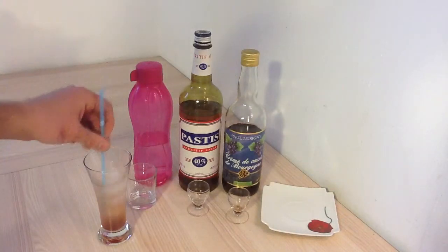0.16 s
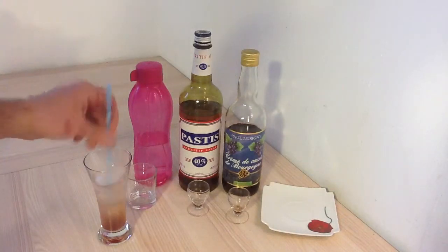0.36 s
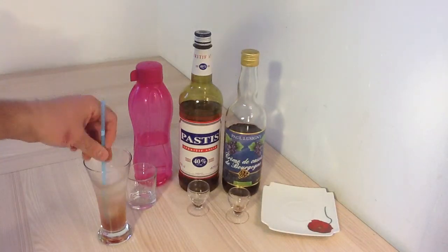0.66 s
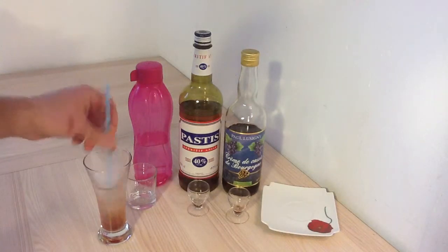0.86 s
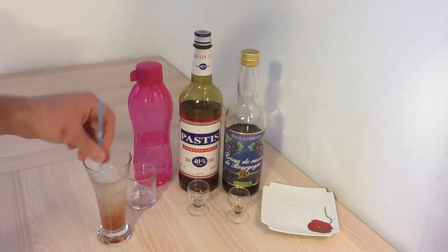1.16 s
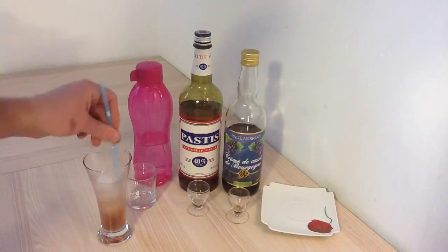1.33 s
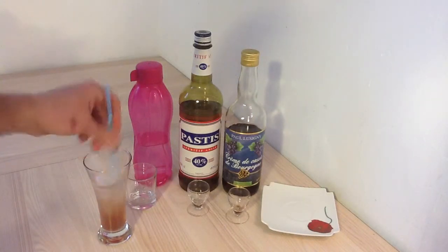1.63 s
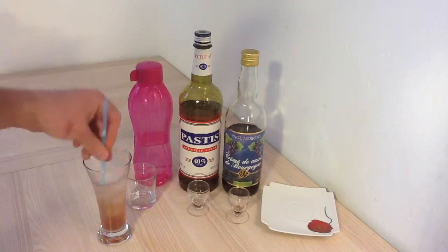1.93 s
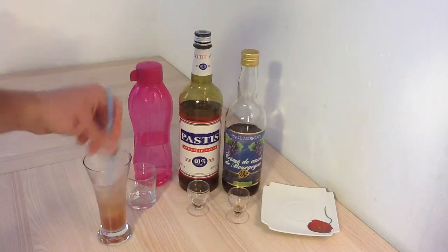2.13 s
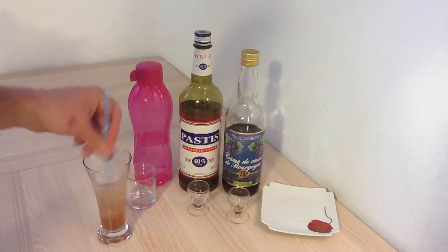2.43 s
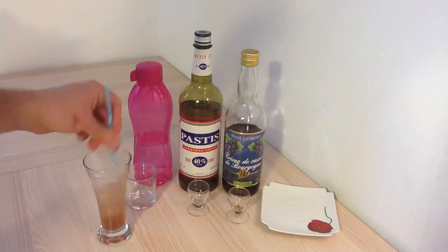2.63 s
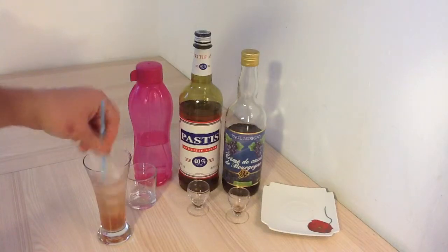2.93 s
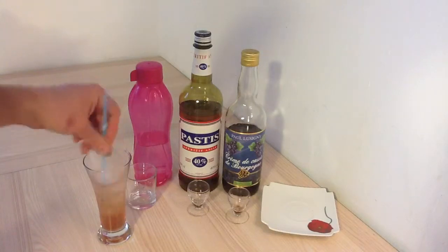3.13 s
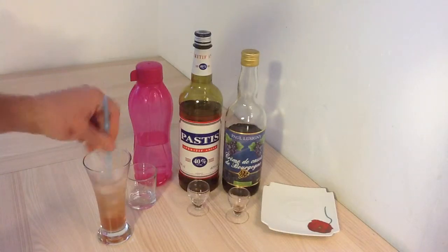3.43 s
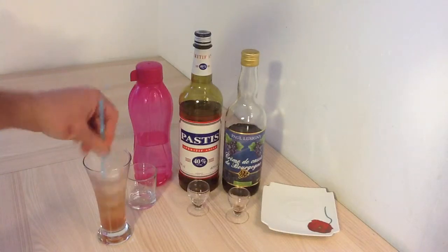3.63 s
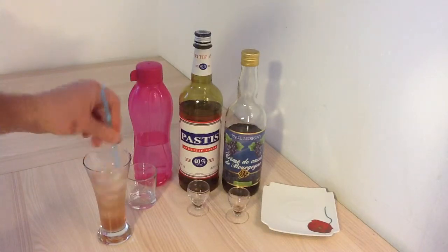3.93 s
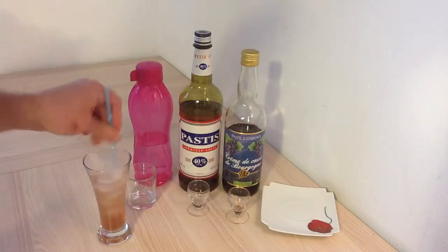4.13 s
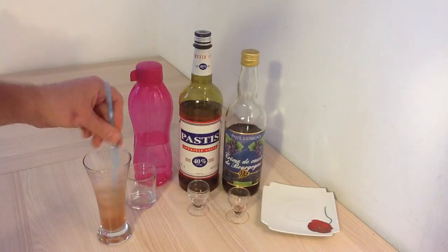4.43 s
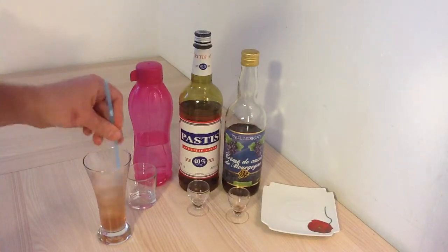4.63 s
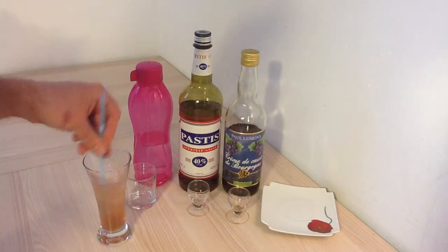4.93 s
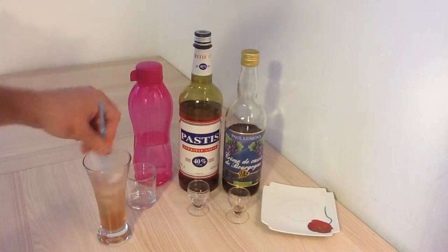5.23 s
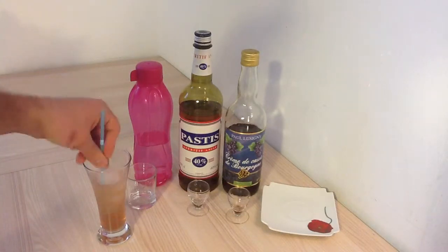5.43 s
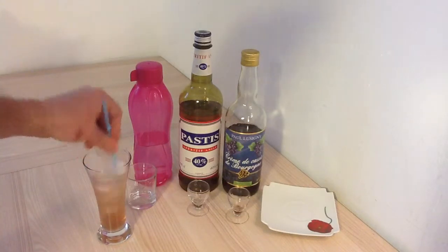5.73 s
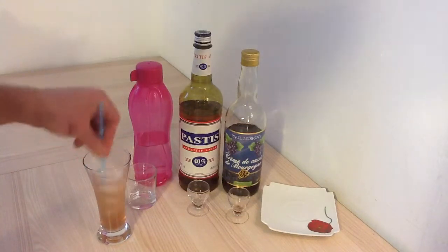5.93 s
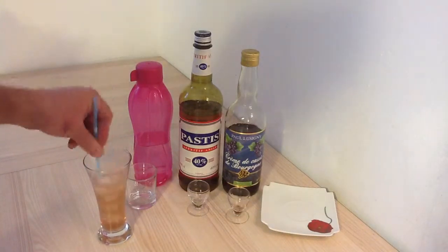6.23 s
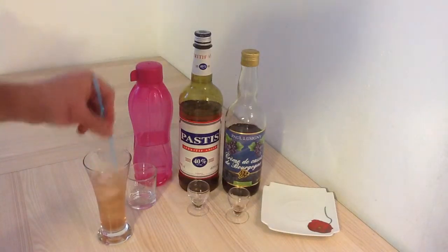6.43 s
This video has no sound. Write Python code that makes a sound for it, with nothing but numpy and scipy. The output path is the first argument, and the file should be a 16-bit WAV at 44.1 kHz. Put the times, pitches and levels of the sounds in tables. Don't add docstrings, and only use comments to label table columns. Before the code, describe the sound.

Ice cubes clink and rattle brightly against a tall glass as a drink is stirred with a straw in a quiet room.

```python
import sys
import numpy as np
from scipy import signal
from scipy.fft import rfft, irfft, next_fast_len
from scipy.io import wavfile
from scipy.ndimage import uniform_filter1d

SR = 44100
rng = np.random.default_rng(int(sys.argv[2]) if len(sys.argv) > 2 else 0)


def attenuation_scalar(level_db):
    decades = np.asarray(level_db, float) / 20
    return 10 ** decades


def bounce(signal):
    frames = np.transpose(np.atleast_2d(signal))
    limited = np.clip(frames, -1, 1)
    pcm = np.round(limited * 32767).astype(np.int16)
    wavfile.write(sys.argv[1], SR, pcm)


N = 289296

# frequency in Hz, density in dB per Hz.
ROOM_TONE = [(41, -55), (70, -4.5), (177, -1), (292, -1), (366, -12), (525, -4.5), (616, -8), (2190, -21),
             (2450, -3), (2810, -16), (15700, -23.5)]
# frequency in Hz, t60 in seconds.
ROOM_DECAY = [(300, 0.59), (2500, 0.18), (6000, 0.29), (14000, 0.25)]

# time in seconds, straw effort in dB, second mode over low mode in dB
STIR = [(0.0, -52, 8), (0.55, -53.5, -13), (0.75, -51, 4.5), (0.89, -49, 9), (1.09, -57, -11),
        (1.7, -53, -7), (2.19, -51, 7), (2.36, -52, -6), (3.21, -54, -18), (3.309, -48, -3),
        (3.95, -51.5, -3.5), (4.99, -52, 5), (5.1, -57, -0.5), (5.33, -54, -21), (5.59, -51.5, -34),
        (6.14, -47.5, 5), (6.28, -49.5, -2), (6.56, -45.5, -30)]
# frequency in Hz, density in dB per Hz.
SLOSH_COLOUR = [(150, -11.5), (350, 20.5), (900, 1.5), (1700, 5.5), (3200, -1), (5500, -1.5), (7500, -37),
                (12000, -3.5), (15500, -50)]

PINGS = [(0.0551, -34.5, 7, 4275), (0.3357, -36, 4, 4260), (1.069, -31.5, -11, 4290),
         (1.1677, -49, 12.5, 4210), (1.302, -32, 2, 4270), (1.3967, -35, 5.5, 4250), (1.438, -39, -8, 4270),
         (1.5728, -33, -10, 4230), (1.6466, -33.5, -4, 4257), (2.021, -27.5, -5, 4270),
         (2.0415, -22, -0.5, 4236), (2.0745, -26, -7, 4220), (2.081, -24, 1, 4303), (2.63, -33.5, -6, 4190),
         (2.8655, -42, 13.5, 4270), (3.3314, -47, 18, 4290), (3.5025, -34, -10, 4250),
         (3.5705, -38, -2, 4240), (3.718, -45, 3, 4270), (0.3283, -38, -9, 4220), (0.86, -38, 2, 4400),
         (1.7046, -47, -5, 4260), (2.2005, -32, -11, 4290), (2.618, -41, -6, 4230), (2.666, -39, -15, 4280),
         (4.7033, -36.5, 3, 4240), (4.78, -52, -1, 4350), (5.543, -34, -7, 4300),
         (2.8217, -24.5, -12, 4220), (3.7675, -22, -21, 4224), (3.9139, -26, -1, 4236),
         (4.4134, -29, -2, 4220), (4.562, -38, 5, 4230), (4.8484, -34, 7, 4300), (5.3125, -34.5, 2.5, 4260),
         (5.601, -27.5, -6, 4234), (6.1038, -22.5, -5, 4340), (5.8148, -34.5, -2, 4160),
         (6.4705, -43.5, 9.5, 4230), (6.527, -41, -24, 4270)]
SQUARE_BLOWS = [(0.076, -28, -4, 4274), (0.595, -33.5, 1, 4254), (0.65, -35.5, -10, 4210),
                (0.6673, -29.5, -3, 4275), (0.7475, -26, -14, 4190), (0.907, -47.5, 14.5, 4370),
                (1.1165, -39.5, -14, 4240), (1.498, -53.5, 15.5, 4310), (2.2657, -27, -4, 4260),
                (2.2896, -25.5, -7, 4250), (2.7586, -23.5, -11, 4256), (3.7546, -33, -4, 4280),
                (3.8178, -25.5, -10, 4240), (4.2317, -30, -7, 4193), (4.361, -22, -12, 4243),
                (4.4525, -25, -35, 4265), (4.58, -27, -6, 4260), (4.816, -27, -21, 4320),
                (4.9445, -27.5, -23, 4280), (5.568, -35.5, -5, 4180)]
CHIPS = [(0.0014, -29.5, 6, 4277), (0.288, -37.5, 6, 4300), (0.5044, -52, 17, 4260),
         (0.53, -33.5, -19, 4210), (0.784, -30.5, 1, 4264), (1.528, -32, -4, 4284), (1.9499, -41, 6, 4270),
         (2.1874, -37.5, 3.5, 4190), (2.415, -42, 9.5, 4230), (2.573, -33.5, 7.5, 4280),
         (2.704, -36, -27, 4280), (2.736, -34, -3, 4280), (1.844, -32.5, -7, 4260),
         (3.1604, -35.5, 5.5, 4260), (3.199, -21, -1.5, 4256), (5.9195, -30.5, 0, 4280),
         (3.347, -32, -6, 4300), (3.408, -31.5, -22, 4270), (3.436, -28.5, -8, 4220),
         (3.6699, -27, -4, 4320), (3.8858, -39, -12, 4200), (5.266, -47, -23, 4220),
         (5.5233, -31.5, -3.5, 4230), (5.736, -27.5, -49, 4260), (0.259, -38, -28, 4290),
         (6.0582, -17, -12, 4295), (6.0792, -19, -13, 4250), (6.3274, -36.5, 3, 4290),
         (0.9908, -34, -5, 4240)]
JAMS = [(0.115, -48, -17, 4270), (0.616, -40.5, 1, 4350), (1.0095, -38.5, 8, 4300), (1.264, -45, 9, 4250),
        (1.2887, -44, 10, 4250), (1.38, -46, -5, 4230), (1.7641, -49, 9, 4260), (1.7794, -34.5, -4, 4310),
        (1.8268, -37.5, 6, 4325), (2.5105, -38, 3, 4270), (2.931, -31.5, -43, 4280),
        (2.9698, -42.5, 7, 4236), (3.645, -44, 1, 4260), (4.1097, -33, -4, 4280), (4.69, -43, -13, 4190),
        (4.957, -34.5, -9, 4305), (5.014, -35, 2.5, 4255), (5.228, -59, -19, 4340),
        (5.468, -30.5, -1, 4280), (5.587, -42.5, 0, 4350), (5.698, -32, -9, 4260),
        (5.9301, -31.5, -6, 4320), (5.9567, -32.5, -2, 4230), (5.9941, -31.5, -1, 4280),
        (6.0326, -28, 2, 4324), (6.0445, -29, -2, 4370), (6.13, -31.5, 3, 4340)]
# crack over ring in dB, ring time in seconds.
CONTACT_KINDS = [(-32.5, 0.042), (-14.5, 0.054), (-11, 0.045), (-3, 0.08)]
# start in seconds,
# ring level in dB, low mode over it in dB, second mode in Hz, ring time in seconds.
SLAMS = [(0.8725, -20.5, 1.5, 4320, 0.025), (2.1011, -14.5, 0, 4270, 0.036),
         (2.8335, -17.5, -3.5, 4216, 0.032), (3.039, -24.5, -6, 4236, 0.024),
         (3.23, -12.5, -0.5, 4287, 0.061), (3.2725, -21, -9, 4354, 0.037), (3.301, -21.5, -22, 4204, 0.048),
         (3.4494, -21, -17, 4220, 0.079), (3.68, -21.5, -11.5, 4266, 0.072), (3.99, -21, -13, 4236, 0.045),
         (4.1382, -22, -2, 4270, 0.074), (4.6128, -16, -6.5, 4232, 0.035),
         (4.826, -12.5, -10.5, 4250, 0.028), (4.8841, -15.5, -10, 4210, 0.069),
         (5.023, -47, 14.5, 4244, 0.2), (5.7494, -19.5, -30, 4270, 0.034), (5.9775, -17, -8.5, 4266, 0.092)]
# frequency in Hz, level in dB, t60 as a factor of the ring time.
UPPER_MODES = [(6702, -15.5, 2.2), (9820, -31.5, 1.4), (13700, -34, 0.6)]

# start in seconds, peak level in dB, pitch in Hz.
TINKS = [(0.0473, -34, 3600), (0.1116, -41, 3630), (0.5985, -30.5, 3620), (0.8599, -27, 3980),
         (0.8719, -19, 3640), (1.01, -33, 3160), (1.0715, -27, 3680), (1.7799, -39, 3570),
         (1.8277, -31, 3600), (1.843, -24, 3740), (2.1011, -20, 3660), (2.2648, -34, 3720),
         (2.4154, -34, 3500), (2.574, -31, 3280), (2.9302, -39, 3260), (3.1924, -25, 3000),
         (3.229, -11, 3650), (3.3553, -24, 3760), (3.5708, -31, 3670), (3.7105, -27, 3050),
         (3.7668, -25, 3000), (3.8172, -27, 3520), (3.911, -28, 3060), (3.9893, -33, 3430),
         (4.131, -28, 2980), (4.2418, -55, 3850), (4.3602, -32, 3030), (4.6136, -29, 3100),
         (4.825, -25, 3970), (4.8252, -14, 3730), (4.8848, -21, 3630), (5.5214, -39, 3080),
         (5.711, -28, 3700), (5.9229, -42, 3590), (5.9309, -33, 3040), (5.976, -23, 3640),
         (6.0566, -15, 3100), (6.1295, -41, 3260), (6.328, -27, 3380), (6.47, -30, 3320)]
# start in seconds, peak level in dB, pitch in Hz.
SPLINTERS = [(0.048, -51, 7730), (0.076, -39, 9840), (0.5057, -52, 11700), (0.5285, -43, 11700),
             (0.674, -33, 7940), (0.7467, -41, 11500), (0.767, -41, 8140), (0.874, -30, 7610),
             (0.9104, -36, 7760), (0.991, -39, 7870), (1.009, -36, 7860), (1.286, -43, 7600),
             (1.7794, -37, 8100), (1.8285, -36, 11200), (2.0325, -29.5, 7860), (2.101, -39, 9820),
             (2.2655, -40, 7700), (2.448, -37.5, 9400), (2.6655, -47, 10400), (2.736, -43, 9400),
             (2.833, -32.5, 9820), (2.929, -37, 7600), (2.943, -32, 9800), (3.219, -37, 9000),
             (3.182, -43, 7600), (3.2016, -34, 9800), (3.203, -29, 8750), (3.301, -37.5, 9700),
             (3.3445, -37, 7840), (3.406, -40, 8040), (3.5718, -46, 9300), (3.5887, -37, 9840),
             (3.6561, -32.5, 11000), (3.8177, -37.5, 7900), (4.1082, -28, 9760), (4.361, -40, 11400),
             (4.4792, -40.5, 7560), (4.561, -40, 10100), (4.578, -33.5, 12300), (4.6124, -27.5, 9700),
             (4.688, -40.5, 9820), (4.799, -35.5, 8660), (4.8255, -28.5, 8700), (4.885, -29, 13700),
             (5.0165, -41, 8650), (5.466, -28, 8000), (5.6914, -31, 8700), (5.8152, -44, 10300),
             (5.931, -34, 7400), (5.928, -33, 7500), (6.0126, -31.5, 9800), (6.0597, -40, 8350)]
# start in seconds, peak level in dB, pitch in Hz.
CUBE_CLICKS = [(0.077, -45, 5400), (0.2875, -34, 5530), (0.505, -40, 5400), (0.5294, -39, 5550),
               (0.6475, -36, 5570), (0.673, -22.5, 5430), (0.769, -31, 5500), (0.85, -35, 5480),
               (0.9118, -21, 5570), (1.528, -42, 5410), (1.756, -36, 5430), (1.774, -31, 5440),
               (1.9797, -32.5, 5450), (2.031, -23, 5480), (2.1011, -33, 5440), (2.2552, -30.5, 5370),
               (2.4159, -52, 5500), (2.4513, -31.5, 5550), (2.5367, -30.5, 5650), (2.7352, -45, 5570),
               (2.8325, -30, 5570), (2.9522, -35, 5500), (3.1597, -47, 5400), (3.192, -27, 5030),
               (3.1958, -21, 5600), (3.204, -27, 5570), (3.228, -23, 5440), (3.346, -32, 5280),
               (3.435, -25.5, 5400), (3.574, -36, 5440), (3.5894, -33, 5330), (3.6027, -26, 5430),
               (3.6566, -30, 5480), (3.8167, -33, 5200), (3.9038, -30.5, 5460), (3.9888, -38, 4900),
               (4.1078, -20.5, 5380), (4.341, -30.5, 5370), (4.361, -38, 5540), (4.4507, -44, 6060),
               (4.482, -46, 5500), (4.612, -33, 5640), (4.687, -33, 5710), (4.7983, -36, 5600),
               (4.827, -37, 5360), (4.8858, -29, 5530), (4.945, -33, 5330), (5.015, -36, 5300),
               (5.4639, -30.5, 5660), (5.47, -26, 5480), (5.6905, -24, 5640), (5.8147, -34, 5520),
               (5.9189, -45, 5860), (5.9324, -43, 5440), (5.9797, -29, 5550), (6.014, -20.5, 5700),
               (6.044, -28, 5770), (6.0785, -19, 5630), (6.3836, -48, 5370)]
# start in seconds, peak level in dB, pitch in Hz.
PLOPS = [(0.077, -41, 1400), (0.78, -49, 1620), (1.009, -44.5, 1610), (6.15, -38, 2020),
         (1.574, -45.5, 1640), (1.6316, -48, 1630), (2.0155, -47, 1680), (2.08, -47, 1590),
         (2.753, -43.5, 1670), (3.222, -44, 1780), (4.5836, -45, 1740), (5.039, -43, 1910),
         (5.232, -52, 1650), (6.267, -43, 1800), (6.311, -44, 1860), (1.299, -47, 1640),
         (1.7618, -47, 1990), (1.777, -46, 1810), (2.271, -46, 1670), (2.5012, -50, 1580),
         (2.929, -48, 1590), (3.432, -46, 1620), (3.587, -48, 1780), (3.619, -39, 1720), (3.645, -32, 1715),
         (3.881, -44.5, 1576), (3.902, -46, 1640), (4.085, -51, 1630), (4.106, -43, 1670),
         (4.137, -40, 1590), (4.342, -48, 1670), (4.827, -42, 1600), (4.836, -38, 1400),
         (4.8452, -28.5, 1700), (4.848, -38, 1340), (5.67, -43.5, 1840), (5.919, -42, 1620),
         (5.9774, -34, 1610), (6.0152, -31, 1680), (6.041, -26.5, 1570), (6.078, -27, 1780),
         (6.11, -33, 1890), (6.1298, -23.5, 1720), (6.2395, -33.5, 1650)]
# start in seconds, peak level in dB, pitch in Hz.
KNOCKS = [(0.614, -39, 403), (2.935, -45.5, 344), (2.548, -44, 375), (2.772, -42.5, 408), (2.931, -41, 512),
          (3.232, -41.5, 338), (4.151, -36.5, 394), (4.943, -47.5, 517), (5.473, -49.5, 367),
          (5.701, -45, 407), (5.723, -41, 326), (5.758, -41.5, 346), (5.931, -48, 414), (6.077, -41, 361)]

# frequency in Hz, gain in dB.
WALL_CRACK = [(500, -6.5), (1500, -7.5), (3500, 2.5), (5800, 0.5), (8000, -4.5), (14000, -9.5)]
# frequency in Hz, gain in dB.
CUBE_CRACK = [(1500, -8), (3500, -2.5), (5600, 8.5), (7500, -4), (14000, -11)]
# frequency in Hz, gain in dB.
SPLINTER_CRACK = [(3000, -23), (6000, 8.5), (8000, 1.5), (11000, -1.5), (15000, -7)]

LOW_HZ, SECOND_HZ = 2405, 4236
LOW_TWIN_HZ, SECOND_TWIN_HZ = 46, 73.5


def unit(x):
    return x / np.sqrt(np.mean(x ** 2) + 1e-20)


def along(points, hz):
    f, v = np.transpose(points)
    return np.interp(np.log(hz + 1), np.log(f + 1), v)


def filtered(x, response):
    m = next_fast_len(len(x) + 8192)
    return irfft(rfft(x, m) * response(np.fft.rfftfreq(m, 1 / SR)), m)[:len(x)]


def mode(f, hz, width_hz):
    return 1j * f * width_hz / (hz * hz - f * f + 1j * f * width_hz)


def ring(t, hz, t60, rise):
    return np.sin(2 * np.pi * hz * t) * attenuation_scalar(-60 * t / t60) * (1 - np.exp(-t / rise))


def cluster(t, hz, offsets, spread, t60, rise):
    modes = sum(ring(t, hz * (1 + spread * k), t60, rise) for k in offsets)
    return modes / np.sqrt(len(offsets))


def blank(length_s):
    return np.zeros(N + SR), np.arange(int(SR * length_s)) / SR


def add(track, s, sound):
    track[round(s * SR):][:len(sound)] += sound


def cracks(times, levels_db, low_hz, colour):
    out, t = blank(1 / 6)
    for s, db, u in zip(times, levels_db, rng.random((len(times), 12))):
        snap = sum(ring(t[:1500], low_hz * (15000 / low_hz) ** k, 0.0059, 0.0004) for k in u)
        noise = rng.standard_normal(len(t))
        edge = (0.68 + 0.76 * u[2]) * attenuation_scalar(-60 * t / 0.43) * noise
        rasp = 1.37 * uniform_filter1d(noise, size=4) + edge
        grit = 0.5 + 1.05 * np.repeat(rng.random(len(t) // 30) < .13, 30)
        rasp_t60 = 0.11 + 0.28 * u[1]
        rasp_gain = attenuation_scalar(db - 11.5 + 5 * (u[0] - 1.0) - 60 * t / rasp_t60)
        add(out, s, attenuation_scalar(db - 12.5) * snap)
        add(out, s, rasp_gain * (1 - np.exp(-t / 0.00019)) * grit * rasp)
    return filtered(out[:N], lambda f: attenuation_scalar(along(colour, f)))


def contacts(slam_crack_db=-20):
    blows = [(s, db, low_db, slam_crack_db, t60, hz) for s, db, low_db, hz, t60 in SLAMS]
    for rows, (crack_db, t60) in zip((PINGS, SQUARE_BLOWS, CHIPS, JAMS), CONTACT_KINDS):
        blows += [(s, db, low_db, crack_db, t60, hz) for s, db, low_db, hz in rows]
    return np.array(sorted(blows))


def agitation(gather_s=0.0087, settle_s=0.034):
    s, db, _, crack_db = contacts().T[:4]
    kicks = np.bincount(np.round(s * SR).astype(int), attenuation_scalar(.5 * (db + crack_db)), N)

    def settling(f):
        w = 2 * np.pi * f
        return 1 / (1 + 1j * w * settle_s) / (1 + (w * gather_s) ** 2)

    level_db = 20 * np.log10(filtered(kicks, settling).clip(0) + 1e-9)
    return level_db - level_db.mean()


def taps(rate_hz, spread_db):
    hit = rng.random(N) < rate_hz / SR
    return hit * rng.choice([-1, 1], N) * attenuation_scalar(spread_db * np.minimum(rng.exponential(size=N), 3))


def hush(level_db=-57):
    return attenuation_scalar(level_db) * unit(filtered(rng.standard_normal(N), lambda f: attenuation_scalar(along(ROOM_TONE, f))))


def stir(slosh_db=-61, slosh_growth=0.52, ticks_db=-6):
    s, *columns = np.transpose(STIR)
    effort_db, height_db = (np.interp(np.arange(N) / SR, s, c) for c in columns)
    restless_db = agitation()
    slosh_level_db = slosh_db + slosh_growth * (effort_db - effort_db.mean())
    levels_db = [effort_db + 3, effort_db + height_db, slosh_level_db]
    busy = (0.5, 0.12, 0.21)
    low, second, slosh = attenuation_scalar(levels_db + np.outer(busy, restless_db))

    def second_modes(f):
        return mode(f, SECOND_HZ, 30) + 0.23 * mode(f, 6702, 32) + 0.24 * mode(f, 5450, 69)

    low_flicker = unit(filtered(taps(300, spread_db=-4.5), lambda f: mode(f, LOW_HZ, 39.5)))
    second_flicker = unit(filtered(taps(300, spread_db=3.0), second_modes))

    clump_decay = attenuation_scalar(-60 * np.arange(2000) / SR / 0.057)
    clumps = signal.fftconvolve(np.abs(taps(260, spread_db=0.0)), clump_decay)[:N]
    crunch = (0.057 + unit(clumps)) * rng.standard_normal(N)

    def wet_ice(f):
        return attenuation_scalar(along(SLOSH_COLOUR, f)) * np.abs(1 + 1.5 * mode(f, 5250, 250))

    def loose_ice(f):
        return (0.8 * mode(f, 5485, 110) + 0.5 * mode(f, 2570, 470)) * mode(f, 3600, 5600)

    ticks = unit(filtered(taps(110, spread_db=5), loose_ice)) * attenuation_scalar(ticks_db + 0.5 * restless_db)
    flicker = low * low_flicker + second * second_flicker
    return attenuation_scalar(-2.0) * flicker + attenuation_scalar(5.5) * slosh * (unit(filtered(crunch, wet_ice)) + ticks)


def clinks(mute_db=-11, mute_s=0.0041):
    wall, t = blank(1 / 5)
    blows = contacts()
    luck = rng.standard_normal((len(blows), 5))
    gaps_s = np.diff(blows[:, 0], append=N)
    for (s, db, low_db, crack_db, t60, hz), z, gap_s in zip(blows, luck, gaps_s):
        tune = hz / SECOND_HZ
        low_hz = LOW_HZ * tune ** 1.62
        t60 = max(t60, .01)
        rise = 0.0012 * attenuation_scalar(-.3 * (max(crack_db, -27) + 22.5))

        second = ring(t, hz, 3.2 * t60, rise)
        second += 0.15 * z[0] * ring(t, hz + SECOND_TWIN_HZ, 0.62 * t60, rise)
        choke = 0.13 + 0.8 * attenuation_scalar(-60 * (t / (0.58 * t60)) ** 4)
        low = ring(t, low_hz, 1.6 * t60, 3.5 * rise)
        low += 0.25 * z[1] * ring(t, low_hz + LOW_TWIN_HZ, t60, rise)
        tone = second * choke + attenuation_scalar(low_db) * low

        for (upper_hz, level_db, longer), chance in zip(UPPER_MODES, z[2:]):
            upper_db = level_db + 0.19 * (crack_db + 5.5) + 2.5 * chance
            upper = cluster(t, upper_hz * tune ** 0.1, z[:2], 0.0015, longer * t60, 0.34 * rise)
            tone += attenuation_scalar(upper_db) * upper

        tone *= attenuation_scalar(mute_db * np.clip((t - gap_s) / mute_s, 0, 1))
        add(wall, s, attenuation_scalar(db + 0.5) * tone)
    return wall[:N] + cracks(blows[:, 0], blows[:, 1] + blows[:, 3] + 12, 2380, WALL_CRACK)


def tinks():
    out, t = blank(1 / 8)
    for (s, db, hz), z in zip(TINKS, rng.standard_normal((len(TINKS), 3))):
        tone = ring(t, hz, 0.02, 0.00066)
        tone += 0.57 * cluster(t, hz, z, spread=0.068, t60=0.042, rise=0.00065)
        add(out, s, attenuation_scalar(db - 10.5) * tone)
    return out[:N]


def splinters(wall_hz=9800):
    out, t = blank(1 / 8)
    for s, db, hz in SPLINTERS:
        t60 = 0.036 + 0.094 * abs(mode(hz, wall_hz, 150))
        add(out, s, attenuation_scalar(db - 11.5) * ring(t, hz, t60, rise=0.00026))
    times, levels_db, _ = np.transpose(SPLINTERS)
    return out[:N] + cracks(times, levels_db + 4, 7300, SPLINTER_CRACK)


def cubes():
    out, t = blank(1 / 8)
    for (s, db, hz), z in zip(CUBE_CLICKS, rng.standard_normal((len(CUBE_CLICKS), 5))):
        add(out, s, attenuation_scalar(db - 9.5) * cluster(t, hz, z, spread=0.0144, t60=0.086, rise=0.0019))
        add(out, s, attenuation_scalar(db - 16) * ring(t, hz, 0.012, rise=0.001))
    times, levels_db, _ = np.transpose(CUBE_CLICKS)
    return out[:N] + cracks(times, levels_db - 1, 3660, CUBE_CRACK)


def plops(climb_per_s=0.18):
    out, t = blank(1 / 8)
    for (s, db, hz), z in zip(PLOPS, rng.standard_normal((len(PLOPS), 20))):
        climb = climb_per_s * t
        add(out, s, attenuation_scalar(db + 10.0) * ring(t, hz * (1 + climb), 0.021, rise=0.0012))
        for late, pitch in z.reshape(-1, 2):
            late = abs(late)
            bubble = ring(t, hz * (1.04 + .13 * pitch + climb), 0.045, rise=0.00077)
            add(out, s + 0.036 * late, attenuation_scalar(db - 9.0 - 1.8 * late) * bubble)
    return out[:N]


def knocks():
    out, t = blank(1 / 4)
    for (s, db, hz), z in zip(KNOCKS, rng.standard_normal((len(KNOCKS), 4))):
        thud = ring(t, hz, 0.098, 0.0027) + 0.2 * ring(t, 0.334 * hz, 0.13, 0.0074)
        thud += 1.14 * cluster(t, 1.062 * hz, z, spread=0.219, t60=0.047, rise=0.0015)
        add(out, s, attenuation_scalar(db + 1.5) * thud)
    return out[:N]


def room(x, size):
    out = np.zeros(N + SR)
    for start in range(0, N, size):
        hz, t, z = signal.stft(rng.standard_normal(SR // 2), SR, nperseg=256)
        decay = attenuation_scalar(-60 * t / along(ROOM_DECAY, hz)[:, None])
        tail = signal.istft(z * decay, SR, nperseg=256)[1]
        tail /= np.linalg.norm(tail)
        add(out, start / SR + .006, signal.fftconvolve(x[start:start + size], tail))
    return out[:N]


def scene():
    near = stir() + clinks() + tinks() + splinters() + cubes() + plops() + knocks()
    return (near + attenuation_scalar(-7.0) * room(near, size=8192) + hush())[None]


def low_pass(x):
    return signal.sosfilt(signal.butter(12, 16430, fs=SR, output="sos"), x)


def record(dry):
    top_hz, bass_hz, hum_hz, hum_db = 15480, 112, 50, -82

    def microphone(f):
        treble = np.clip((top_hz - f) / 300, .01, 1)
        bass = f ** 8 / (f ** 8 + bass_hz ** 8) + .06
        return treble * bass

    hum = attenuation_scalar(hum_db) * np.sin(2 * np.pi * hum_hz * np.arange(N) / SR)
    mix = filtered(dry[0], microphone) + hum
    return low_pass(mix[None])


dry = scene()
out = record(dry)
bounce(out)
```